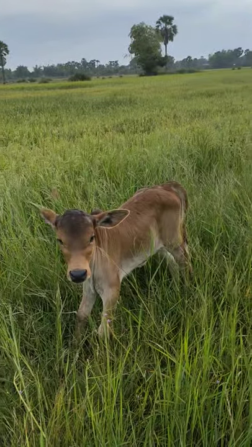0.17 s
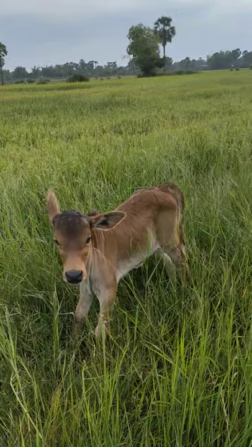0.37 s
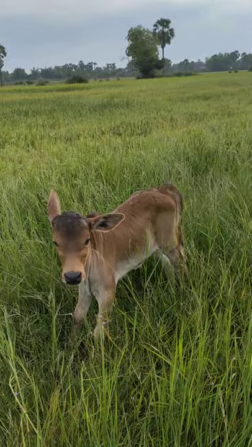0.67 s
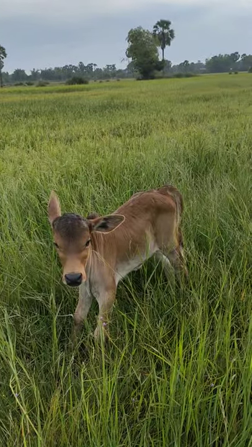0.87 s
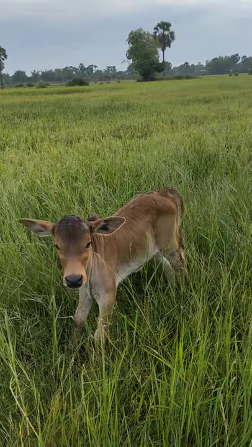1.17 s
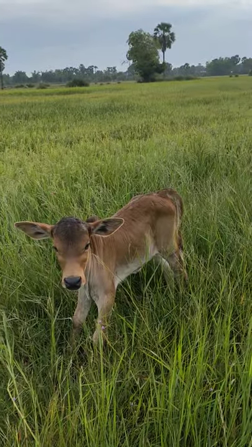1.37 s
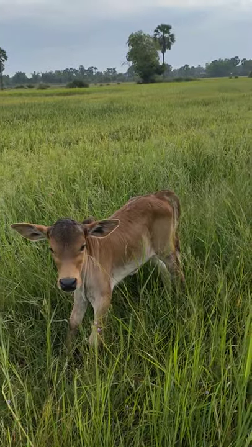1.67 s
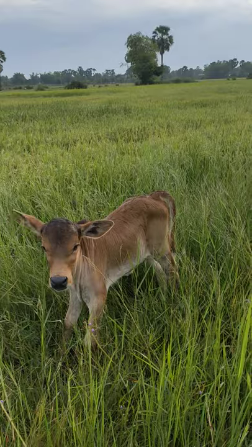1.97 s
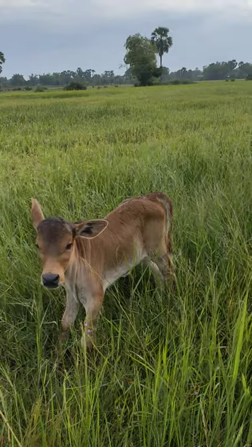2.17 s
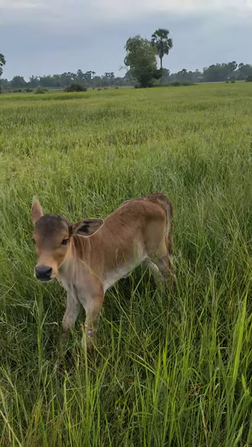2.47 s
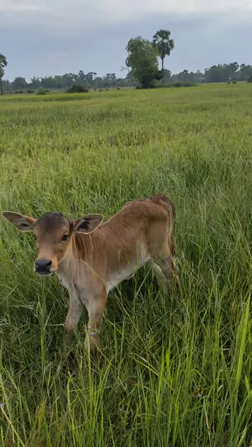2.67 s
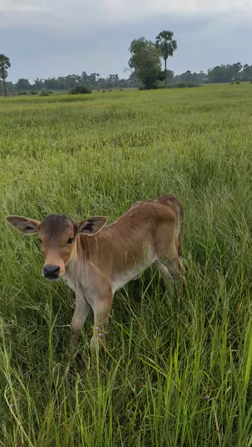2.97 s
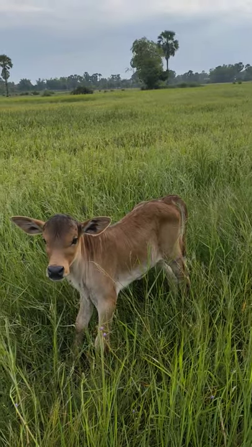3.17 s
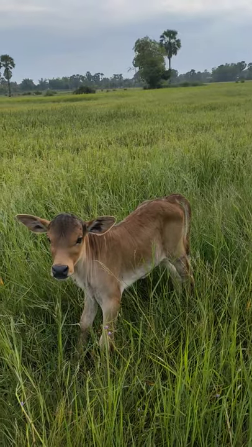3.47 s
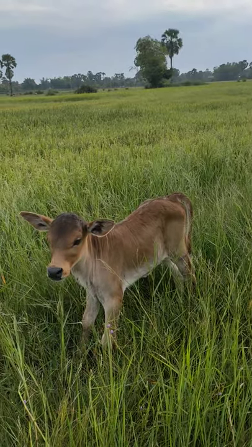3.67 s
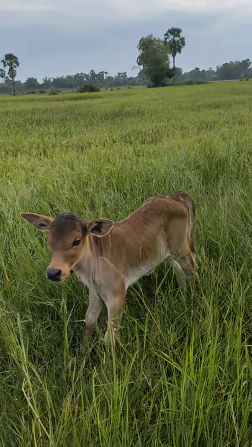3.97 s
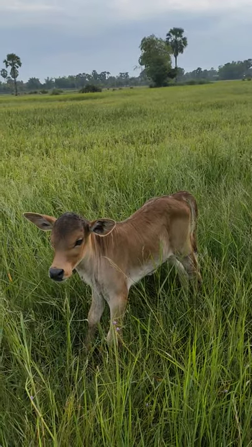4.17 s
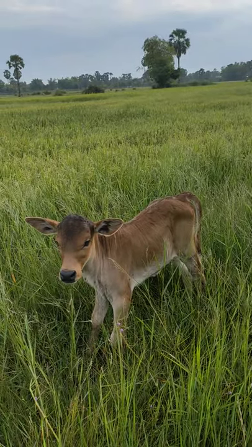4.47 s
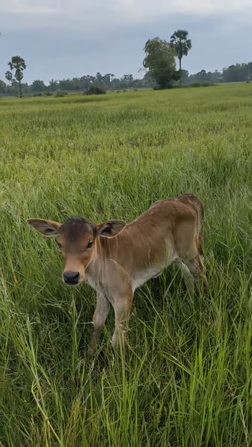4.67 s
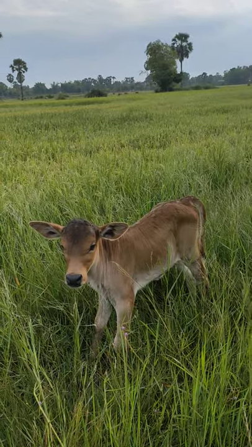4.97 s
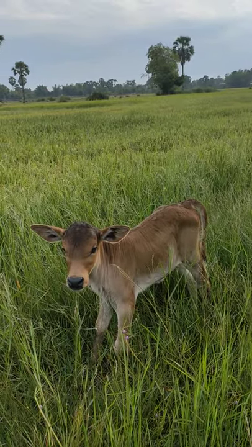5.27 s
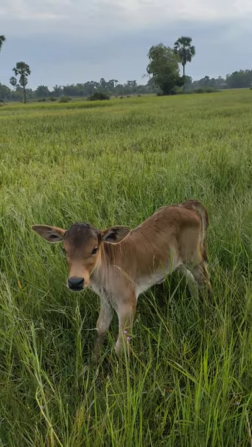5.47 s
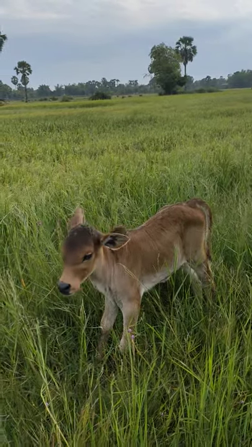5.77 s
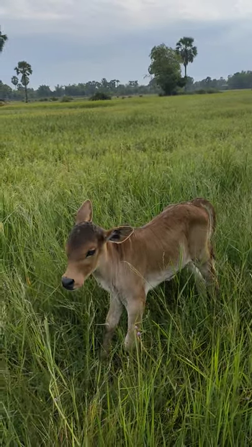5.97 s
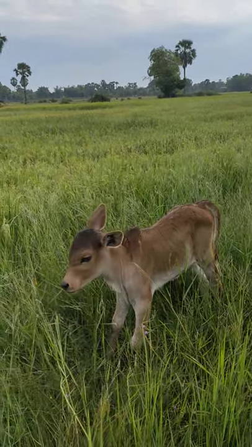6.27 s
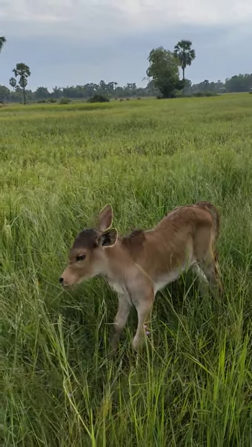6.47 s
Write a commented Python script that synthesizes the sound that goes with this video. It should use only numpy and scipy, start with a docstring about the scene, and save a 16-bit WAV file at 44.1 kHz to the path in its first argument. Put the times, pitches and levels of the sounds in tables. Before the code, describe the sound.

In a wet, open grassy field, a distant engine drones low under a few light wind bumps on the hand-held stereo microphone. A cricket pulses rapidly on the left, katydids buzz in spells, and small birds chirp mostly on the right. Bubbles plop in the mud, most thickly about two seconds in. Near the end, one step swishes through wet grass, snapping stalks and sucking at the mud.

```python
"""A wet grassy field at a hand-held pair of microphones. From the start a far engine drones under
light wind, a cricket scrapes its wings on the left, katydids buzz in spells all round and small birds
chirp, mostly on the right. Bubbles plop in the mud, thickly just after 2 s, where the cricket falters;
it is steady again from 4 s. Near 6 s a step swishes through wet grass, snapping stalks and sucking mud."""
import sys
import numpy as np
from scipy import signal
from scipy.io import wavfile
from scipy.ndimage import uniform_filter1d

SR = 44100
rng = np.random.default_rng(int(sys.argv[2]) if len(sys.argv) > 2 else 0)


def generate_wav(sig):
    """Save sig (samples, or channels by samples) to the path in sys.argv[1] as 16-bit PCM at SR."""
    pcm = np.round(np.clip(np.atleast_2d(sig).T, -1, 1) * 32767).astype(np.int16)
    wavfile.write(sys.argv[1], SR, pcm)


N = 291501
TIME_S = np.arange(N) / SR
LAG, INSECT_LAG, STEP_LAG = 7, 13, -20  # samples by which the right channel trails the left


def gain_of(db):
    """Decibels to gain."""
    return 10 ** (np.asarray(db) / 20)


def unit_rms(x):
    """Scales to rms 1."""
    return x / np.sqrt(np.mean(x ** 2) + 1e-20)


def butter(x, order, hz, kind):
    """Butterworth filter."""
    return signal.sosfilt(signal.butter(order, hz, kind, fs=SR, output="sos"), x)


def at_hz(rows, hz):
    """Interpolates (freq_hz, value) rows on a log axis."""
    freq_hz, value = np.transpose(rows)
    return np.interp(np.log(hz + 1), np.log(freq_hz + 1), value)


def curve(rows):
    """Interpolates (time_s, value) rows at every sample."""
    return np.interp(TIME_S, *np.transpose(rows))


def wander(rate_hz):
    """Slow random drift of rms 1."""
    span = int(SR / 20 / rate_hz)
    slow = uniform_filter1d(uniform_filter1d(rng.standard_normal(N // 20 + 2), span), span)
    return unit_rms(np.interp(np.arange(N) / 20, np.arange(len(slow)), slow))


def add(mix, start_s, sound, pan_db, lag=LAG):
    """Mixes a sound in; pan_db is left minus right."""
    start = round(start_s * SR)
    for channel, first, db in [(0, start, pan_db / 2), (1, start + lag, -pan_db / 2)]:
        part = mix[channel, max(first, 0):][:len(sound)]
        part += (sound * gain_of(db))[:len(part)]


def resonate(x, hz, width_hz):
    """Resonance: shifts hz down to zero, smooths, shifts back."""
    carrier = np.exp(2j * np.pi * hz * np.arange(1, len(x) + 1) / SR)
    pole = np.exp(-np.pi * width_hz / SR)
    return 2 * (carrier * signal.lfilter([1 - pole], [1, -pole], x / carrier + 1e-18)).real


def glide(mix, rows, pan_db, rough, trill_hz=0, trill_depth=.4, lag=LAG):
    """A sine along (time_s, pitch_hz, level_db) rows, roughened by fast flutter."""
    times_s, pitches_hz, levels_db = np.transpose(rows)
    t = np.arange(times_s[0], times_s[-1], 1 / SR)
    flutter = unit_rms(uniform_filter1d(rng.standard_normal((2, len(t))), 70))
    hz = np.interp(t, times_s, pitches_hz) * (1 + .0895 * rough * flutter[0])
    tone = np.sqrt(2) * np.sin(2 * np.pi * np.cumsum(hz) / SR) * (1 + rough * flutter[1])
    trill = 1 + trill_depth * np.sin(2 * np.pi * trill_hz * t)
    envelope = gain_of(np.interp(t, times_s, levels_db)) * signal.windows.tukey(len(t), .2)
    add(mix, times_s[0], envelope * trill * tone, pan_db, lag)


# Left-right likeness of noise: freq_hz, correlation
COHERENCE = [(30, 1), (70, 1), (150, 0.96), (300, 0.93), (700, 0.48), (1500, 0.32), (4000, 0.15),
             (12000, 0.051)]

def noise(spectrum, pan, size, lag, patchy_db, flicker_db, coherence):
    """Stereo noise from random short-time spectra; above the bass it drifts in patches and flickers."""
    frames, hz = 4 * N // size + 5, np.fft.rfftfreq(size, 1 / SR)
    a, b, c, d, patches = rng.standard_normal((frames, len(hz), 5)).T
    left, other = a + 1j * b, c + 1j * d
    shared = coherence * at_hz(COHERENCE, hz)[:, None]
    treble_delay = np.exp(-2j * np.pi * hz * lag / SR * (hz > 1500))[:, None]
    right = shared * treble_delay * left + np.sqrt(1 - shared ** 2) * other
    patches = unit_rms(uniform_filter1d(uniform_filter1d(patches, size // 64, 0), 10, 1))
    flicker = np.outer(1 / (1 + (hz / 6000) ** 4), rng.standard_normal(frames))
    drift_db = (patchy_db * patches + flicker_db * flicker) * (hz / (hz + 600))[:, None]
    side_db = np.outer([.5, -.5], at_hz(pan, hz))[:, :, None]
    spectra = np.array([left, right]) * gain_of(at_hz(spectrum, hz)[:, None] + side_db + drift_db)
    return unit_rms(signal.istft(spectra, nperseg=size, noverlap=3 * size // 4)[1][:, :N])


# Noise floor: freq_hz, density_db
AIR_SPECTRUM = [(12, -39), (20, -19), (44, -7), (137, -4), (713, -35.5), (996, -32.5), (3040, -36),
                (6120, -48), (7050, -36), (7650, -28), (8150, -40.5), (9500, -32.5), (10100, -39.5),
                (11400, -33), (11900, -44), (13000, -41), (14500, -39), (15800, -36.5)]
# Its balance: freq_hz, pan_db
AIR_PAN = [(60, -0.5), (180, -0.7), (550, -0.7), (1650, -1.1), (4970, 3.5), (15000, -2.5)]

def air():
    """Air of the field and microphone hiss."""
    hiss = noise(AIR_SPECTRUM, AIR_PAN, size=1024, lag=LAG, patchy_db=3.5, flicker_db=1.5, coherence=1)
    return gain_of(-50.5) * hiss


# Engine speed: time_s, firing_hz
FIRING_RATE = [(0, 36.5), (.96, 38), (1.4, 37.5), (1.8, 38.5), (2.5, 36.5), (2.9, 37.5), (4.6, 37.5),
               (5.25, 36.5), (6.1, 37.5), (6.61, 37.5)]
# Engine harmonics: multiple, level_db
ENGINE_ORDERS = [(1, -19), (2, 2), (3, 2.5), (4, -0.5), (5, -5.5), (6, -25.5), (7, -22), (8, -27.5),
                 (9, -22.5)]
# Exhaust roar: time_s, level_db
EXHAUST_LEVEL = [(0, -67.5), (.8, -63.5), (1.0, -73), (2.1, -76), (2.8, -62), (3.6, -65.5), (5.3, -60),
                 (6.61, -62)]

def engine():
    """Low orders add up to one suck of pressure a firing; the exhaust puffs with each."""
    phase = 2 * np.pi * np.cumsum(curve(FIRING_RATE) * (1 + .01235 * wander(12.7))) / SR
    drone = sum(gain_of(db + 2.4 * wander(25)) * -np.cos(multiple * phase + .54 * wander(8))
                for multiple, db in ENGINE_ORDERS)
    puffs = butter(rng.standard_normal(N), 2, [130, 330], "band") * (1 + .51 * np.cos(phase))
    exhaust = unit_rms(puffs) * gain_of(curve(EXHAUST_LEVEL))
    return (gain_of(-52) * unit_rms(drone) + exhaust) * gain_of([[-.25], [.25]])


# Buffeting: time_s, level_db
WIND_LEVEL = [(0, -48.5), (.16, -48.5), (.3, -70), (.6, -56), (.8, -48.5), (1.05, -56), (1.2, -59),
              (2.2, -85), (3.3, -50), (3.45, -70), (3.9, -76), (4.25, -58), (5.2, -86), (6.61, -69)]
# Pressure bumps: centre_s, level_db, pitch_hz, pan_db, polarity
WIND_BUMPS = [(0.112, -48, 38, -26, 1), (.958, -38, 73, 29.5, 1), (1.034, -42, 57.4, 29, -1)]

def wind(mix):
    """Lumpy low pressure, partly separate at each microphone port, and a few single bumps."""
    low = butter(rng.standard_normal((3, N)), 2, [28, 52], "band")
    mix += unit_rms(low[:2] + .39 * low[2]) * gain_of(curve(WIND_LEVEL) - wander(8))
    t = np.arange(-SR // 20, SR // 20) / SR
    for centre_s, db, hz, pan_db, polarity in WIND_BUMPS:
        bump = np.exp(-(3 * hz * t) ** 2) * np.cos(2 * np.pi * hz * t + .36)
        add(mix, centre_s + t[0], polarity * gain_of(db) * bump, pan_db, lag=0)


# Far birds: time_s, level_db
TWITTER_LEVEL = [(0, -70), (.35, -63.5), (.74, -63.5), (1.1, -75.5), (1.47, -61.5), (1.75, -71),
                 (2.1, -59.5), (2.5, -68), (3, -70), (3.9, -68), (4.3, -74), (4.66, -66.5), (5.0, -70),
                 (5.5, -68), (5.85, -57.5), (6.28, -74), (6.61, -69)]

def twitter():
    """Clusters of short raspy sweeps, too far off and too dense to tell apart."""
    calls, t = np.zeros((2, N)), np.arange(int(.015 * SR)) / SR
    for when, tune, slope, loud, side in rng.random((3000, 5)):
        start_hz = 2900 + 3700 * tune ** .64
        sweep = np.sin(2 * np.pi * start_hz * (t + 20 * (slope - .55) * t ** 2))
        rasp = 1 + 1.7 * np.sin(2 * np.pi * (250 + 300 * side) * t)
        envelope = gain_of(4 * loud) * np.hanning(len(t))
        add(calls, when * N / SR, envelope * sweep * rasp, pan_db=-12 * side - 3)
    return unit_rms(calls) * gain_of(curve(TWITTER_LEVEL) + 2.16 * wander(12.3))


# Far whistles: start_s, length_s, start_hz, middle_hz, end_hz, level_db, pan_db, trill_depth
FAR_WHISTLES = [(0, 0.031, 3020, 3190, 3120, -63.5, -4, .1), (0.008, 0.084, 2670, 2580, 2660, -71, -2, .1),
                (0.365, 0.12, 3790, 3840, 3660, -67, -9, 0.1),
                (0.613, 0.031, 3680, 4000, 3880, -62, -7, 0.3),
                (2.422, 0.12, 3590, 3810, 3330, -65, -9, 0.1), (3.246, 0.027, 2850, 2850, 2750, -67, 10, 0),
                (3.255, 0.043, 2770, 2154, 1760, -63, 3, 0),
                (3.546, 0.043, 2860, 2420, 1750, -64.5, 8.5, 0.4),
                (4.187, 0.087, 3950, 3300, 2830, -77, -5, .6), (4.299, 0.14, 2780, 2800, 2710, -75, -9, .9),
                (4.926, 0.13, 2800, 2690, 2680, -71.5, -4, .9),
                (6.26, 0.022, 3910, 3590, 3200, -62.5, -7, .3), (6.44, .022, 3100, 3300, 3170, -63, -6, .3),
                (6.524, 0.034, 3850, 3800, 3960, -65, -6, .3),
                (6.551, 0.03, 3950, 4600, 5700, -68, -2, 0.35),
                (6.581, .032, 5800, 6050, 5840, -63.5, -8, .4)]

def whistles(mix):
    """Far birds whistle bending notes, most of them trilled."""
    for s, length_s, start_hz, middle_hz, end_hz, db, pan_db, depth in FAR_WHISTLES:
        path = [(s, start_hz, db + 2), (s + length_s / 2, middle_hz, db), (s + length_s, end_hz, db + 2)]
        glide(mix, path, pan_db, rough=.25, trill_hz=42, trill_depth=depth)


# Tseep triplets: start_s, level_db, pitch_hz
TSEEP_TRIPLETS = [(0.08, -64, 6500), (0.801, -60.5, 6460), (3.0126, -64.5, 6450), (3.8492, -63, 6480),
                  (4.792, -63.5, 6390)]

def tseeps(mix, gap_s=.033):
    """Thin falling bird notes in threes."""
    for start_s, level_db, hz in TSEEP_TRIPLETS:
        for k, accent_db in enumerate([-6, .5, -.5]):
            s, db = start_s + k * gap_s, level_db + accent_db
            path = [(s - .002, 1.05 * hz, db - 3), (s + .003, hz, db), (s + .01, .96 * hz, db - 10)]
            glide(mix, path, pan_db=-19, rough=.1)


# Fainter chirps: time_s, level_db, pitch_hz
FLOCK_CHIRPS = [(0.258, -57, 6100), (.6396, -57, 5600), (0.663, -55, 5570), (.69, -51, 3870),
                (0.114, -56, 6010), (0.9563, -53.5, 5980), (2.114, -58, 5420), (2.443, -56, 5050),
                (0.7124, -48, 5780), (.7444, -55, 5620), (0.855, -52, 6220), (1.875, -56, 5620),
                (2.327, -49, 6180), (2.6245, -57, 5760), (3.038, -54, 6100), (3.083, -50, 4100),
                (3.089, -59, 5300), (3.426, -48, 4800), (3.431, -51.5, 5900), (3.458, -60, 5600),
                (3.749, -53.5, 5900), (3.7893, -50, 3970), (4.4195, -54, 5500), (4.6006, -54.5, 3720),
                (4.677, -55, 5870), (4.725, -45, 4670), (4.735, -52, 5920), (4.575, -55, 6150),
                (4.519, -59, 6040), (4.897, -50.5, 5510), (5.268, -53, 5210), (5.3883, -56, 5850),
                (5.426, -52, 4650), (6.109, -54, 3400)]

def flock(mix):
    """Each chirp rises quickly, then sags in a raspy fall."""
    for s, db, hz in FLOCK_CHIRPS:
        path = [(s - .007, .76 * hz, db - 17), (s + .004, 1.03 * hz, db - 11),
                (s + .013, .93 * hz, db - 13), (s + .032, .8 * hz, db - 24)]
        glide(mix, path, pan_db=-6.5, rough=.55, trill_hz=120)


# Strokes of one chirp, timed from its peak: start_s, end_s, start_hz, end_hz, start_db, end_db
CHIRP_STROKES = [(-.016, -0.003, 5860, 6360, -22, -22), (-.007, 0.000, 3740, 5440, -20, -17),
                 (-.002, 0.008, 5855, 5834, -10.5, -4), (.007, 0.045, 5710, 5790, -18, -45),
                 (0.01, 0.038, 4300, 4880, -25, -20.5), (0.034, 0.059, 3540, 5340, -10, -31),
                 (0.047, .062, 5000, 4800, -24, -21), (0.05, 0.063, 4673, 3767, -22.5, -10.5),
                 (0.062, 0.078, 3668, 2784, -15.5, -18.5), (0.078, 0.103, 2954, 2520, -20, -39)]
# Rasp of each stroke: roughness
STROKE_RASP = [.45, .2, .2, .65, .95, .3, .55, .38, .42, .65]
# Near chirps: peak_s, level_db, pan_db, pitch_ratio, second_half_db
NEAR_CHIRPS = [(0.476, -41.5, -11.5, 1.02, 3), (1.444, -42.5, -7.5, 0.98, 4),
               (2.81, -39.5, -7.5, .97, -0.5), (3.985, -36.5, -8.5, 1.01, 0),
               (5.5479, -37, -7.5, 1.004, 2.5)]

def near_bird(mix, second_half_s=.02):
    """Chirps of overlapping strokes, roughened by the flutter of the syrinx."""
    for peak_s, db, pan_db, ratio, second_half_db in NEAR_CHIRPS:
        for (start_s, end_s, start_hz, end_hz, start_db, end_db), rough in zip(CHIRP_STROKES, STROKE_RASP):
            base_db = db + second_half_db * (start_s > second_half_s)
            path = [(peak_s + start_s, ratio * start_hz, base_db + start_db),
                    (peak_s + end_s, ratio * end_hz, base_db + end_db)]
            glide(mix, path, pan_db, rough, trill_hz=170)


def birds(t60_s=.11, echo_db=-5.5):
    """All bird calls, smeared by sparse echoes from grass and trees."""
    calls = twitter()
    for source in (near_bird, flock, tseeps, whistles):
        source(calls)
    t = np.arange(int(.08 * SR)) / SR
    echoes = rng.standard_normal((2, len(t))) * (rng.random((2, len(t))) < .05)
    echoes *= gain_of(-60 * t / t60_s) * (t > .004)
    echoes *= gain_of(echo_db) / np.linalg.norm(echoes[0])
    return calls + signal.oaconvolve(calls, echoes, axes=1)[:, :N]


# Wing bands: centre_hz, width_hz, pulse_hz, pan_db, throb_hz, throb_db
KATYDIDS = [(10835, 900, 120, 3, 0, 0), (8580, 600, 210, 9, 0, 0), (9210, 560, 130, 5.5, 10.5, 13.5),
            (13250, 1600, 810, -5, 0, 0)]
# Spells, one list per insect: start_s, end_s, start_db, end_db
KATYDID_SPELLS = [
    [(0, 3.88, -64.5, -65.5), (3.88, 4.8, -75, -66.5), (4.51, 8, -69, -62.5)],
    [(2.04, 2.225, -67, -60.5), (2.36, 2.545, -64.5, -61), (2.73, 2.905, -67, -62.5)],
    [(0, 0.79, -60.5, -62.5)],
    [(.55, 1.3, -67, -79), (2.85, 3.2, -67, -73), (5.24, 5.9, -67, -72), (6.15, 6.9, -71, -68)],
]
# Spell edges per insect: fade_s
KATYDID_FADES_S = [.03, 0.04, .03, 0.12]

def katydids(mix):
    """Each insect scrapes noise in quick pulses through a narrow wing band, in spells."""
    for insect, spells, fade_s in zip(KATYDIDS, KATYDID_SPELLS, KATYDID_FADES_S):
        hz, width_hz, pulse_hz, pan_db, throb_hz, throb_db = insect
        level = np.zeros(N)
        for start_s, end_s, start_db, end_db in spells:
            active = (TIME_S >= start_s) & (TIME_S < end_s)
            level += active * gain_of(np.interp(TIME_S, [start_s, end_s], [start_db, end_db]))
        level = uniform_filter1d(level, int(fade_s * SR))
        level *= gain_of(-throb_db * np.sin(np.pi * throb_hz * (TIME_S - .03)) ** 2)
        pulses = 1.7 + np.sin(np.pi * np.cumsum(pulse_hz * (1 + .00725 * wander(3.2))) / SR) ** 4
        left, other = rng.standard_normal((2, N))
        right = .2 * np.roll(left, INSECT_LAG) + other
        buzz = butter([left, right], 3, [hz - width_hz / 2, hz + width_hz / 2], "band") * pulses
        mix += buzz / buzz.std(1)[:, None] * level * gain_of([[pan_db / 2], [-pan_db / 2]])


# Near cricket: last_stroke_s, level_db, length_s
CRICKET_CHIRPS = [(0.045, -54, 0.04), (0.131, -54, 0.035), (0.214, -53.0, 0.03), (0.295, -53.0, 0.03),
                  (0.383, -55, 0.031), (0.465, -54, 0.032), (0.547, -53.5, 0.031), (0.636, -53.5, 0.029),
                  (0.723, -51.5, 0.036), (0.802, -52, 0.031), (0.891, -52.0, 0.032), (0.972, -53.5, 0.032),
                  (1.062, -52.5, 0.037), (1.145, -51.5, 0.032), (1.223, -52, 0.028), (1.312, -52.0, 0.041),
                  (1.401, -51.5, 0.035), (1.488, -54, 0.037), (1.575, -53.0, 0.036), (1.663, -53.5, 0.035),
                  (1.746, -51, 0.026), (1.832, -52.5, 0.031), (2.019, -51.5, 0.034), (2.226, -51.5, 0.023),
                  (2.356, -54, 0.042), (2.817, -58.0, 0.042), (2.955, -60.0, 0.041), (3.053, -60.0, 0.032),
                  (3.155, -60.0, 0.039), (3.238, -60, 0.022), (3.331, -62, 0.029), (3.423, -56, 0.029),
                  (3.522, -61, 0.042), (3.622, -57, 0.022), (3.738, -58, 0.041), (3.822, -64, 0.041),
                  (3.905, -61, 0.042), (4.006, -59, 0.04), (4.078, -56.0, 0.022), (4.167, -55.0, 0.029),
                  (4.255, -53.5, 0.022), (4.34, -56.0, 0.027), (4.427, -53.0, 0.027), (4.51, -58, 0.037),
                  (4.594, -54.0, 0.024), (4.679, -57, 0.034), (4.761, -54.5, 0.029), (4.843, -55.5, 0.04),
                  (4.928, -52.0, 0.037), (5.012, -54, 0.038), (5.09, -55, 0.032), (5.169, -57, 0.028),
                  (5.254, -54.5, 0.042), (5.34, -54.5, 0.045), (5.426, -55.5, 0.038), (5.513, -54.5, 0.042),
                  (5.598, -55, 0.04), (5.692, -53, 0.031), (5.773, -52, 0.028), (5.852, -55.0, 0.046),
                  (5.94, -54, 0.046), (6.024, -54, 0.034), (6.113, -54, 0.041), (6.197, -56, 0.035),
                  (6.281, -54.0, 0.032), (6.362, -52.5, 0.03), (6.452, -53, 0.04), (6.535, -52, 0.036)]

def cricket(mix, wing_hz=7705, sweep_hz_per_s=7500, stroke_hz=134, growth_db=5.5):
    """A few quick wing strokes grow and rise in pitch up to the last, then stop short."""
    for last_s, db, length_s in CRICKET_CHIRPS:
        jitter = rng.standard_normal(14)
        t = np.arange(-int(length_s * SR), int(SR / stroke_hz / 2)) / SR
        strokes = abs(np.cos(np.pi * t * stroke_hz * (1 + .034 * jitter[0]))) ** 1.63
        uneven_db = 1.5 * jitter[2:][np.round(-t * stroke_hz).astype(int)]
        envelope = gain_of(db + 2 + growth_db * t / length_s + uneven_db)
        envelope *= signal.windows.tukey(len(t), .15)
        pitch_hz = wing_hz * (1 + .00505 * jitter[1]) + sweep_hz_per_s * t
        tone = np.sin(2 * np.pi * np.cumsum(pitch_hz) / SR)
        add(mix, last_s + t[0], envelope * strokes * tone, pan_db=7, lag=INSECT_LAG)


# Plops: time_s, level_db, pitch_hz
MUD_PLOPS = [(.36, -52, 680), (.403, -53, 1145), (0.423, -47, 1060), (.45, -55, 1256), (.629, -60, 780),
             (.822, -49.5, 750), (.891, -62, 850), (1.385, -59, 484), (1.43, -62, 640), (1.547, -50.5, 600),
             (1.996, -52, 1116), (2.0092, -39, 1650), (2.018, -50, 1730), (2.027, -50, 1274),
             (2.072, -45, 720), (2.09, -44, 937), (2.115, -49.5, 573), (2.133, -52.5, 1230),
             (2.182, -45, 616), (2.197, -39.5, 756), (2.2025, -36.5, 848), (2.24, -56, 692),
             (2.266, -55, 737), (3.791, -56, 578), (3.878, -57, 478), (4.93, -62, 652), (5.147, -52, 1073),
             (5.191, -62, 545), (5.788, -44.5, 2860), (5.816, -45.5, 2050), (5.8275, -48, 2120),
             (5.856, -47, 2070), (5.882, -42, 2390), (5.895, -42.5, 570), (5.937, -37.5, 1567),
             (5.971, -43, 850), (6.083, -45.5, 1800), (6.209, -49.5, 1583)]

def mud_plops(mix, step_s=5.7):
    """A wet splat around two short bubbles, the lower one rising in pitch."""
    t = np.arange(int(.06 * SR)) / SR
    for s, db, hz in MUD_PLOPS:
        bubbles = np.sin(2 * np.pi * hz * (t + 2.5 * t ** 2)) + .3 * np.sin(2 * np.pi * 1.45 * hz * t)
        grit, width_hz = rng.standard_normal(len(t)), .69 * hz
        splat = unit_rms(resonate(resonate(grit, hz, width_hz), hz, width_hz))
        stretch = 2.06 + .3 * max(-42.5 - db, 0)  # faint plops are slower scuffs
        rise_s, t60_s = .0011 * stretch, .021 * stretch
        envelope = (1 - np.exp(-t / rise_s)) ** 2 * gain_of(db - 60 * t / t60_s)
        pan_db, lag = (-.5, LAG) if s < step_s else (-4.5, STEP_LAG)
        add(mix, s - .003, envelope * (.72 * bubbles + 1.03 * splat), pan_db, lag)


# Long bubbles, one path each: time_s, pitch_hz, level_db
SUCK_PATHS = [
    [(.356, 790, -63), (.362, 987, -50), (.372, 965, -56), (.378, 720, -69)],
    [(5.9, 517, -43), (5.908, 520, -47.5), (5.924, 624, -46), (5.954, 735, -66)],
]

def mud_sucks(mix):
    """Two long bubbles suck shut, the second under the step."""
    early, underfoot = SUCK_PATHS
    glide(mix, early, pan_db=0, rough=.13)
    glide(mix, underfoot, pan_db=-3, rough=.13, lag=STEP_LAG)


# Snapping stalks: time_s, level_db, pitch_hz, pan_db
STALK_SNAPS = [(5.788, -46, 6600, -7), (5.8132, -43, 7250, -7.0), (5.823, -45, 6990, -7),
               (5.8345, -47, 6600, -7), (5.84, -39, 6330, -11), (5.857, -43, 7390, -7),
               (5.873, -40, 8130, -7), (5.8778, -38, 6840, -8), (5.886, -40, 7200, -8),
               (5.8957, -40, 6820, -8), (5.9092, -35, 6350, -11), (5.909, -34, 3380, -11),
               (5.9155, -42, 7030, -8), (5.9284, -44, 6710, -8), (5.936, -46, 3070, -7),
               (5.9457, -33, 3320, -11), (6.0238, -30, 6830, -15), (6.084, -35.5, 6900, -10),
               (6.0913, -39, 8060, -7), (6.1087, -44, 3250, -6), (6.151, -50, 5000, -6),
               (6.276, -47, 3360, -5), (6.345, -53, 6000, -5), (6.381, -37, 6260, -6)]

def stalk_snaps(mix, ring_t60_s=.0045, tick_t60_s=.0035):
    """Stalks break under the foot, each with a tick and a brief ring."""
    t = np.arange(int(.018 * SR)) / SR
    for s, db, hz, pan_db in STALK_SNAPS:
        ring = np.sin(2 * np.pi * hz * t) * (1 + .34 * np.sin(2 * np.pi * 900 * t))
        ring *= gain_of(-60 * t / ring_t60_s) * (1 - np.exp(-t / .00043))
        tick = np.diff(rng.standard_normal(len(t)), prepend=0)
        tick *= gain_of(-5 - 60 * t / tick_t60_s) * np.minimum(t / .0006, 1)
        add(mix, s + .00022, gain_of(db) * (2.14 * ring + tick), pan_db, STEP_LAG)


# Wet grass: freq_hz, density_db
GRASS_SPECTRUM = [(410, -28), (700, -6.5), (995, -32), (1360, -3), (2210, -3.5), (2900, -6), (4100, -8.5),
                  (5200, -12.5), (6430, 0), (8120, -6.5), (9630, -5.5), (11500, -9), (12700, -15),
                  (14300, -8), (15800, -7.5)]
# Its balance: freq_hz, pan_db
GRASS_PAN = [(60, 2), (180, 3), (550, -3), (1650, -3.5), (4970, -8), (15000, -6.5)]
# Swish of the step: time_s, level_db
SWISH_LEVEL = [(5.6, -100), (5.69, -65.5), (5.82, -46), (5.945, -42), (5.97, -52), (6.03, -48), (6.06, -53),
               (6.078, -51.5), (6.092, -46), (6.14, -53.5), (6.3, -57.5), (6.61, -58)]

def grass_swish(mix, foot_down_s=5.95):
    """A foot brushes wet grass; stalks, blades and tips each crackle on their own."""
    crackle_db = 2.5 * np.minimum(rng.exponential(1, (3, N // 40 + 1)), 4)
    crackle = gain_of(crackle_db).repeat(40, 1)[:, :N]
    swish = noise(GRASS_SPECTRUM, GRASS_PAN, size=256, lag=STEP_LAG,
                  patchy_db=2.5, flicker_db=2, coherence=.28)
    settled = np.clip((TIME_S - foot_down_s) / .069, 0, 1)
    swish -= .69 * settled * butter(swish, 1, 2500, "low")  # foot down: mostly the thin tips move
    stalks, tips = butter(swish, 2, 3300, "low"), butter(swish, 2, 8500, "high")
    blades = swish - stalks - tips
    rustle = stalks * crackle[0] + blades * crackle[1] + tips * crackle[2]
    mix += unit_rms(rustle) * gain_of(curve(SWISH_LEVEL))


def scene():
    """The field in stereo."""
    mix = air() + engine() + birds()
    for source in (wind, cricket, katydids, mud_plops, mud_sucks, grass_swish, stalk_snaps):
        source(mix)
    return mix


def record(dry):
    """A steep band limit, then a small DC offset."""
    cutoff_hz, dc_offset = 15780, .0029
    taps = signal.firwin(1023, cutoff_hz, window=("kaiser", 9), fs=SR)
    return signal.oaconvolve(dry, taps[None], "same") + dc_offset


dry = scene()
out = record(dry)
generate_wav(out)
```